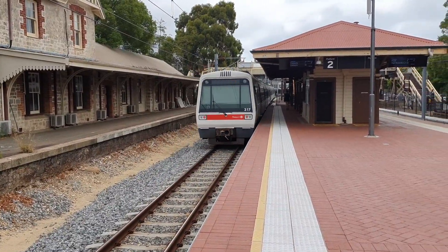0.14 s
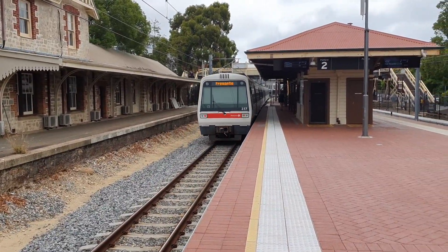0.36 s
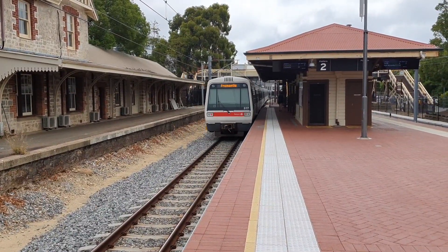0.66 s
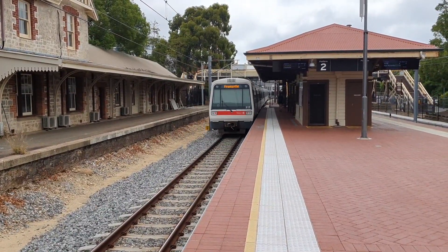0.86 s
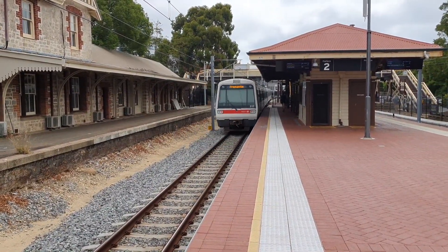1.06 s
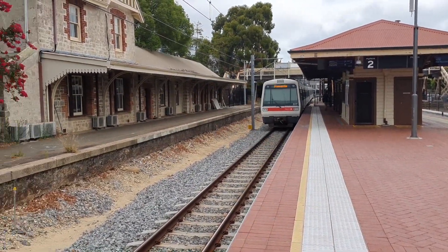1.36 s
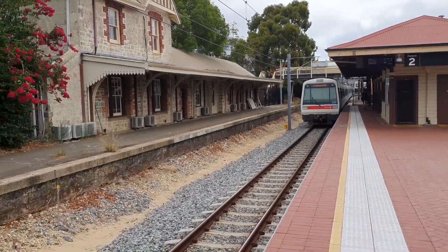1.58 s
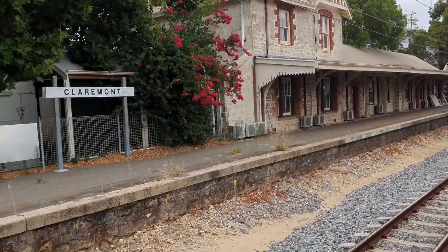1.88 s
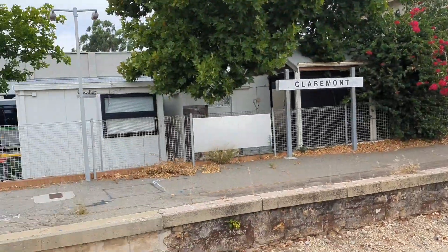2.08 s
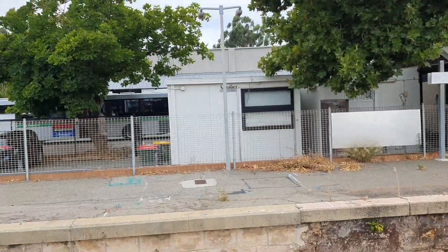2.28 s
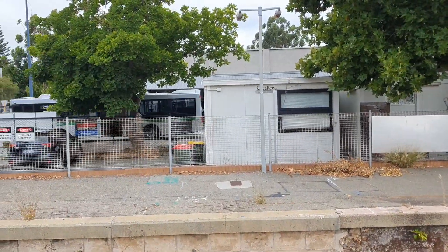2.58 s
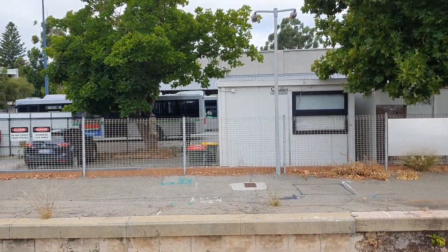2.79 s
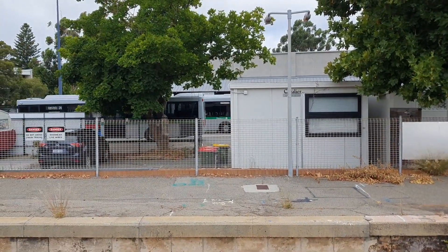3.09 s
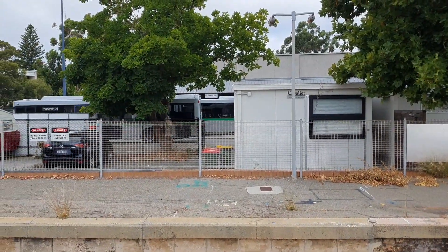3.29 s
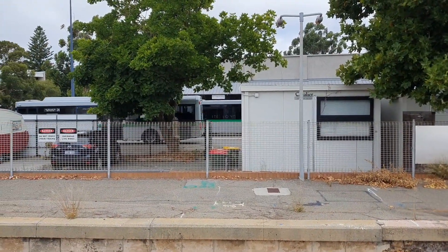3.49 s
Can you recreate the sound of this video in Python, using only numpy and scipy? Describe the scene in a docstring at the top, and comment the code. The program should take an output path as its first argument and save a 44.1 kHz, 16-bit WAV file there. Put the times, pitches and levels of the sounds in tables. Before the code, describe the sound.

Throbbing gear whine of a departing electric train, with low rolling noise and metallic knocks, fades at an open station platform as the handheld phone turns; a bus yard's low drone and light rattles take over.

```python
"""A gear whine climbs and throbs as an electric train pulls away, with wheel knocks, rolling noise and hums.
The phone then turns towards a bus yard, whose drone and rattle take over; birds chirp now and then, and
small ticks come from the hand on the phone. Whine, low tones and chirps are sines, knocks are decaying
sines, and rolling noise, yard, hums, rings and rattles are filtered noise. Sound from one direction
reaches the two ports (left and right microphone openings) at slightly different times."""
import sys
import numpy as np
from scipy import signal
from scipy.fft import rfft, irfft, next_fast_len
from scipy.io import wavfile
from scipy.ndimage import uniform_filter1d, map_coordinates

SR = 44100
rng = np.random.default_rng(int(sys.argv[2]) if len(sys.argv) > 2 else 0)


def persist_wave(psi):
    """Save psi, clipped to +-1, as 16-bit WAV."""
    counts = np.round(np.clip(psi, -1, 1) * 32767).astype(np.int16)
    wavfile.write(sys.argv[1], SR, np.atleast_2d(counts).T)


N = 160965
T = np.arange(N) / SR  # time in seconds
F = np.arange(N // 2 + 1) * SR / N + 1e-3  # frequency in Hz, kept above zero for the logarithms
LONG = next_fast_len(N)  # noises are made a little longer, for speed, and cut
F_LONG = np.arange(LONG // 2 + 1) * SR / LONG + 1e-3


def undb(db):
    """Turn dB into a gain."""
    return 10 ** (np.asarray(db) / 20)


def curve(rows):
    """Read a two-column table along time, with straight lines between rows."""
    return np.interp(T, *np.array(rows).T)


def by_hz(rows, hz):
    """Read a table along log frequency, so equal musical steps count equally."""
    pitch, value = np.array(rows).T
    return np.interp(np.log(hz), np.log(pitch), value)


def walk(rate):
    """Random levels, `rate` new ones per second, joined by slopes; spread near 1."""
    hold = int(SR / rate)
    steps = np.repeat(rng.standard_normal(N // hold + 1), hold)
    return 1.19 * uniform_filter1d(steps, hold)[:N]


def tone(hz, waver_hz):
    """A sine of random phase whose pitch wavers; summing its pitch over time gives its phase."""
    turns = np.cumsum(hz + waver_hz * walk(15)) / SR
    return np.sin(2 * np.pi * (rng.uniform() + turns))


def white():
    """Spectra of three unrelated white noises."""
    return rfft(rng.standard_normal((3, LONG)))


def ring(hz, width_hz):
    """Three unrelated noises narrowed to one resonance, rms 1."""
    resonance = 1 / (1 + (2 * (F_LONG - hz) / width_hz) ** 2)
    x = irfft(white() * resonance, LONG)[:, :N]
    return x / x.std()


def decay(t0, t60, rise):
    """An envelope that rises at t0 and dies away by 60 dB in t60 seconds."""
    since = np.clip(T - t0, 0, None)
    return (1 - np.exp(-since / rise)) * np.exp(-np.log(1000) * since / t60)


TURN_S, TURN_LEN_S = 1.911, 0.26


def turn():
    """Where the phone points: 0 facing the train, 1 facing the yard, with a smooth swing between."""
    return .5 + .5 * np.tanh(2 * (T - TURN_S) / TURN_LEN_S)


# Pitch of the gear mesh as the train gathers speed. Each row: time in seconds, pitch in Hz.
MESH_PITCH = [(0, 273.8), (.14, 279.3), (.31, 287.5), (.45, 282.2), (.6, 284), (.87, 289), (1.1, 292.9),
              (1.3, 296.8), (1.49, 300.6), (1.68, 307), (1.85, 304), (2.1, 305.6), (2.4, 307.8),
              (2.75, 313.3), (3.1, 319.4), (3.4, 322.1), (3.55, 333), (3.65, 331)]
# Throbbing level of the whine, both bogies together. Each row: time in seconds, rms level in dB.
WHINE_LEVEL = [(0.0, -16), (0.02, -51), (0.06, -28.5), (0.09, -30), (0.14, -25.5), (0.2, -40),
               (0.22, -30.5), (0.32, -23.5), (0.37, -45), (0.45, -30), (0.47, -34), (0.5, -27.5),
               (0.6, -20.5), (0.69, -38.5), (0.87, -16.5), (0.92, -30.5), (0.95, -28.5), (0.98, -34),
               (1.05, -26), (1.08, -18), (1.2, -21), (1.23, -29.5), (1.28, -33), (1.31, -18.5), (1.34, -34),
               (1.43, -24), (1.45, -29.5), (1.49, -15.5), (1.54, -29), (1.57, -23.5), (1.62, -30),
               (1.66, -17.5), (1.69, -19), (1.73, -29.5), (1.77, -23.5), (1.8, -43), (1.84, -24.5),
               (1.89, -23), (1.92, -32.5), (2.02, -28), (2.08, -28), (2.11, -28), (2.15, -21.5),
               (2.18, -29), (2.23, -22.5), (2.27, -28), (2.39, -21), (2.43, -28), (2.46, -21), (2.59, -30),
               (2.62, -25), (2.65, -32.5), (2.71, -26), (2.78, -29.5), (2.82, -42), (2.87, -26),
               (2.98, -36), (3.04, -29), (3.13, -26), (3.2, -29.5), (3.27, -28), (3.37, -32.5),
               (3.45, -40.5), (3.5, -36), (3.57, -31.5), (3.62, -54), (3.65, -29)]
# Second bogie (wheel frame). Each row: time in seconds, level against the first bogie in dB.
SECOND_BOGIE_LEVEL = [(0, -17), (1.1, -14.5), (1.7, -11), (2.1, -13), (2.6, -2), (2.9, -7), (3.3, -18),
                      (3.65, -4)]
BOGIE_SHARP_HZ, WHINE_WAVER_HZ = 11, 1.12


def whine():
    """The meshing gear teeth of two bogies sing as two sines, the second one a little sharper."""
    hz = curve(MESH_PITCH)
    second = undb(curve(SECOND_BOGIE_LEVEL))
    both = tone(hz, WHINE_WAVER_HZ) + second * tone(hz + BOGIE_SHARP_HZ, WHINE_WAVER_HZ)
    both = both * np.sqrt(2 / (1 + second ** 2))  # the pair keeps rms 1
    return both * undb(curve(WHINE_LEVEL))


# Low tones that come and go. Each row: time in seconds, then rms level in dB of the tone near 146 Hz,
# of the tone near 100 Hz, and of the tone under the whine.
LOW_TONE_LEVELS = [(0, -40, -28, -45), (.3, -35.5, -41.5, -51), (.62, -39.5, -43, -47),
                   (.75, -46, -48.5, -33), (1.0, -56, -42, -36), (1.35, -52, -45, -39),
                   (1.5, -54, -35.5, -34), (1.65, -47, -50, -38), (1.85, -52, -47, -49),
                   (2.0, -52, -29, -47), (2.15, -44, -40, -52), (2.3, -52, -30.5, -52),
                   (2.4, -44, -38.5, -52), (2.55, -49, -36, -55), (2.7, -50, -30.5, -52),
                   (2.85, -54, -44, -43), (3.65, -52, -43, -59)]
LOW_TONE_HZ, MAINS_TONE_HZ, TONE_WAVER_HZ = 146.2, 98.6, 1.96
UNDER_MESH_SHARE = 0.93  # pitch of the third tone as a share of the smoothed mesh pitch


def tones():
    """Motor and transformer tones below the whine are plain sines; one climbs with the gear mesh."""
    times, *levels = np.array(LOW_TONE_LEVELS).T
    under_mesh = UNDER_MESH_SHARE * uniform_filter1d(curve(MESH_PITCH), SR // 2)
    x = 0
    for hz, db in zip((LOW_TONE_HZ, MAINS_TONE_HZ, under_mesh), levels):
        gain = undb(np.interp(T, times, db))
        x = x + np.sqrt(2) * gain * tone(hz, TONE_WAVER_HZ)  # root 2 brings a sine to rms 1
    return x


# Wheel knocks. Each row: start in seconds, strength in dB.
KNOCK_TIMES = [(0.168, -25), (0.236, -22.5), (0.516, -21), (0.793, -24), (1.07, -25.5), (2.897, -23),
               (3.17, -40)]
# What each knock rings in the wheel. Each row: pitch in Hz, level against the knock's strength in dB,
# time to die away by 60 dB in seconds.
WHEEL_MODES = [(410, -9, 0.3), (461.5, -1.5, 0.45), (487, -3.5, 0.39), (501.3, -3.5, 0.49),
               (548, -13, 0.32), (605, -7.5, 0.33), (871, -8, 0.18)]
KNOCK_WAVER_HZ, KNOCK_RISE_S = 3.98, 0.0064


def knocks():
    """Each knock sets off the wheel's own pitches, each dying away at its own speed."""
    x = 0
    for hz, mode_db, t60 in WHEEL_MODES:
        envelope = sum(undb(db) * decay(t0, t60, KNOCK_RISE_S) for t0, db in KNOCK_TIMES)
        x = x + undb(mode_db) * tone(hz, KNOCK_WAVER_HZ) * envelope
    return x


# Rough rings of the running gear. Each row: time in seconds, then rms level in dB of the ring near 2 kHz,
# near 3.5 kHz and near 4.4 kHz.
RING_LEVELS = [(0.0, -40, -54, -62), (0.06, -52, -60, -60), (0.12, -60, -51, -62), (0.2, -49, -53, -57),
               (0.29, -40.5, -55, -61), (0.42, -63, -60, -76), (0.55, -53, -60, -60), (.8, -49, -57, -64),
               (1.0, -58.5, -57.5, -63), (1.37, -59, -61, -68), (1.85, -52, -61, -61),
               (1.97, -50, -54, -68), (2.14, -52, -57, -74), (2.22, -56, -59, -73), (2.33, -47.5, -61, -76),
               (2.4, -55, -64, -68), (2.45, -40, -64, -61), (2.53, -53.5, -61, -67), (2.9, -52, -68, -71),
               (3.16, -51, -66, -60), (3.4, -58, -58, -60), (3.65, -50, -62, -64)]
RING_HZ = 2045, 3510, 4410
RING_WIDTH_HZ, RING_FAR_WIDTH_HZ = (55, 130, 220), (70, 400, 450)  # near train, far train
RING_FLICKER_DB, RING_FLICKER_PER_S, RING_BLUR_S = 1.5, 30, 1.6


def gear_rings():
    """Noise in three resonances, which blur into wider ones as the train leaves."""
    times, *levels = np.array(RING_LEVELS).T
    far = np.clip(T / RING_BLUR_S, 0, 1) ** 2
    x = 0
    for hz, width_hz, far_hz, db in zip(RING_HZ, RING_WIDTH_HZ, RING_FAR_WIDTH_HZ, levels):
        blurred = np.sqrt(1 - far) * ring(hz, width_hz) + np.sqrt(far) * ring(hz, far_hz)
        flicker = RING_FLICKER_DB * walk(RING_FLICKER_PER_S)
        x = x + blurred * undb(np.interp(T, times, db) + flicker)
    return x


FLICKER_DB, FLICKER_PER_S, SWELL_DB, SWELL_PER_S = .6, 12, .4, 7
TREBLE_FLICKER_DB, TREBLE_FLICKER_PER_S = 1.1, 28


def bed(spectrum, db):
    """Coloured noise in overlapping bands half an octave apart that swell together and flicker alone."""
    spec = white() * undb(by_hz(spectrum, F_LONG))
    spec = spec / irfft(spec, LONG).std()
    swell = SWELL_DB * walk(SWELL_PER_S)
    out = 0
    for k in np.arange(20):
        distance = np.clip(2 * np.log2(F_LONG / 25) - k, -1, 1)  # half octaves from the band's centre
        band = np.cos(np.pi / 2 * distance) ** 2
        flicker = FLICKER_DB * walk(FLICKER_PER_S)
        treble = TREBLE_FLICKER_DB * (k > 12) * walk(TREBLE_FLICKER_PER_S)
        out = out + irfft(spec * band, LONG)[:, :N] * undb(swell + flicker + treble)
    return out * undb(db)


# Colour of the rolling noise facing the train. Each row: pitch in Hz, relative level per Hz in dB.
ROLL_COLOUR = [(16, -32.5), (28, -6.5), (76, -2.5), (130, -11.5), (188, -15.5), (240, -9), (320, -8),
               (363, -17), (449, -9.5), (540, -17), (600, -15.5), (1020, -23.5), (1260, -25), (1360, -30.5),
               (2020, -28), (2710, -35.5), (3010, -40.5), (4020, -45.5), (6500, -49), (9000, -56.5),
               (13900, -60.5), (15600, -76)]
ROLL_DB, FADE_DB_PER_S = -25, -1


def rolling():
    """Wheels rolling on rails make a wide noise that fades as the train leaves and as the phone turns."""
    return np.sqrt(1 - turn()) * undb(FADE_DB_PER_S * T) * bed(ROLL_COLOUR, ROLL_DB)


# Colour of the yard's drone. Each row: pitch in Hz, relative level per Hz in dB.
YARD_COLOUR = [(16, -36), (28, -10.5), (76, 1), (102, -6), (144, -15), (244, -11.5), (320, -9),
               (373, -13.5), (426, -6), (540, -12.5), (616, -14.5), (941, -16), (1050, -24.5), (1190, -20),
               (1470, -30), (2080, -27.5), (2600, -34), (3170, -39), (6000, -47), (8890, -53), (13200, -54),
               (14000, -59.5), (15600, -81)]
YARD_DB = -28


def yard():
    """The bus yard's drone is a wide noise that comes in with the turn."""
    return np.sqrt(turn()) * bed(YARD_COLOUR, YARD_DB)


# Hums and ringing of train and yard. Each row: pitch in Hz, width in Hz, starting level in dB while facing
# the train, level in dB facing the yard; fade, flicker and the rumble's own level act on top of these.
HUM_BANDS = [(53.7, 9.2, -39, -31.5), (97.7, 10.3, -39.5, -36), (422.3, 11.5, -51.5, -39),
             (504, 3.8, -45, -48), (615, 25, -75, -42), (2133, 60, -71, -59), (2210, 60, -73, -57),
             (2340, 99, -65, -56), (2510, 150, -65, -60), (2700, 170, -55.5, -65.5),
             (10150, 1700, -62.5, -68.5)]
HUM_FADE_DB_PER_S, HUM_FLICKER_DB = -1, 1.2
# above this pitch the yard's rattling bands surge together and flutter alone
FLUTTER_ABOVE_HZ, FLUTTER_DB, FLUTTER_PER_S, SURGE_DB, SURGE_PER_S = 2000, 3, 45, 1.5, 9


def hums():
    """Narrow noises hum and ring; their levels glide from train to yard with the turn."""
    yard_share = turn()
    surge = SURGE_DB * walk(SURGE_PER_S)
    x = 0
    for hz, width_hz, train_db, yard_db in HUM_BANDS:
        db = (train_db + HUM_FADE_DB_PER_S * T) * (1 - yard_share) + yard_db * yard_share
        flutter = surge + FLUTTER_DB * walk(FLUTTER_PER_S)
        db = db + (hz > FLUTTER_ABOVE_HZ) * yard_share * flutter
        x = x + ring(hz, width_hz) * undb(db + HUM_FLICKER_DB * walk(8))
    return x


# Boost or cut of the upper rumble around 800 Hz. Each row: time in seconds, change in dB.
MIDDLE_CHANGE = [(0, 0.5), (.7, 0), (1.5, -1), (2.05, -3), (2.6, 0), (3.08, -2), (3.17, 8), (3.28, -3),
                 (3.65, 0.5)]
MIDDLE_HZ, MIDDLE_OCTAVES = 805, 0.43


def shape_middle(x):
    """A smooth band around 800 Hz is made louder or softer along time."""
    bell = np.exp(-(np.log2(F / MIDDLE_HZ) / MIDDLE_OCTAVES) ** 2)
    middle = irfft(rfft(x) * bell, N)
    return x + middle * (undb(curve(MIDDLE_CHANGE)) - 1)


# Level of the low rumble. Each row: time in seconds, level in dB.
RUMBLE_LEVEL = [(0.0, -52), (0.02, -27.5), (0.16, -37), (0.2, -27.5), (0.58, -32.5), (0.61, -30),
                (0.68, -28), (0.83, -30), (0.88, -40), (0.91, -30.5), (1.26, -30.5), (1.43, -37),
                (1.49, -27), (1.67, -34.5), (1.72, -29.5), (1.85, -36), (1.92, -26.5), (2.21, -30.5),
                (3.11, -33.5), (3.14, -53.5), (3.17, -30), (3.27, -36), (3.31, -25), (3.36, -50),
                (3.4, -29), (3.65, -32.5)]
RUMBLE_TOP_HZ = 123
RUMBLE_EVEN, RUMBLE_EVEN_S = 0.26, 0.064  # how far swings are evened out (0-1), and over what time


def shape_rumble(x):
    """The lowest part of the noise has its own swings partly evened out, then follows the level table."""
    low = irfft(rfft(x) / (1 + (F / RUMBLE_TOP_HZ) ** 8), N)
    power = uniform_filter1d(low ** 2, int(RUMBLE_EVEN_S * SR)) + 1e-9
    even = low / power ** (RUMBLE_EVEN / 2)
    return x - low + even / even.std() * undb(curve(RUMBLE_LEVEL))


def noise():
    """All the steady noises together, with middle and rumble shaped."""
    return shape_rumble(shape_middle(rolling() + yard() + hums() + gear_rings()))


# Rattles in the yard. Each row: start in seconds, level in dB.
RATTLE_TIMES = [(2.191, -36.5), (2.447, -38), (2.53, -49), (2.595, -42), (2.674, -42), (2.7192, -45),
                (2.82, -49), (2.855, -36), (2.8724, -41), (2.96, -42), (3.0819, -42), (3.1047, -38),
                (3.14, -45), (3.345, -46), (3.45, -40), (3.611, -50)]
RATTLE_HZ, RATTLE_WIDTH_HZ, RATTLE_T60_S = 2120, 600, 0.096


def rattles():
    """Each rattle is a short burst of noise in one wide resonance."""
    envelope = sum(undb(db) * decay(t0, RATTLE_T60_S, 0.001) for t0, db in RATTLE_TIMES)
    return ring(RATTLE_HZ, RATTLE_WIDTH_HZ)[0] * envelope


# Bird chirps. Each row: start in seconds, length in seconds, first pitch in Hz, last pitch in Hz,
# peak level in dB.
BIRD_CHIRPS = [(.255, .03, 3400, 3170, -51), (.29, .026, 3480, 3190, -46), (1.915, .11, 2950, 2720, -53)]


def chirps():
    """Each chirp is a sine that slides down in pitch while its level rises and falls."""
    x = 0
    for t0, length, from_hz, to_hz, db in BIRD_CHIRPS:
        part = np.clip((T - t0) / length, 0, 1)
        x = x + undb(db) * np.sin(np.pi * part) * tone(from_hz + (to_hz - from_hz) * part, 0)
    return x


# Ticks of the hand. Each row: start in seconds, level in dB, pitch in Hz, left over right in dB.
HAND_TICKS = [(.579, -39, 4500, 0), (.674, -43, 10500, 6), (.72, -41, 5050, 0), (1.435, -48, 9500, 4),
              (.93, -46, 4300, 0), (1.46, -44, 4300, 3), (1.51, -46, 8500, 4), (1.89, -47, 6000, 3),
              (1.905, -47, 10500, 4)]
TICK_T60_S, TICK_RISE_S = .008, .0004
CRACK_DB, CRACK_T60_S = -4, .008  # level against the tick's level


def ticks():
    """Short bright ticks close to the ports: a ringing sine and a thin crack of noise."""
    crack = undb(CRACK_DB) * rng.standard_normal(N)
    x = 0
    for t0, db, hz, pan_db in HAND_TICKS:
        ringing = decay(t0, TICK_T60_S, TICK_RISE_S) * np.sin(2 * np.pi * hz * (T - t0))
        burst = ringing + crack * decay(t0, CRACK_T60_S, TICK_RISE_S)
        left_right = np.array([[pan_db], [-pan_db]]) / 2
        x = x + undb(db + left_right) * burst
    return x


# How much of the noise comes from one direction. Each row: pitch in Hz, share of the power (0-1).
DIRECT_SHARE = [(30, 0.88), (60, 0.99), (300, 0.99), (700, 0.67), (1200, 0.65), (2000, 0.26), (3500, 0.24),
                (8000, 0.13)]


def spread(trio):
    """Of three noises one becomes direct sound, the other two the sound from all around at each port."""
    share = np.clip(by_hz(DIRECT_SHARE, F), 0, 1)
    spec = rfft(trio)
    return irfft(spec[0] * np.sqrt(share), N), irfft(spec[1:] * np.sqrt(1 - share), N)


LAG_BEFORE_S, LAG_AFTER_S = -0.00026, .0004  # left port behind right; below zero the left is ahead
EDGE_S = .003


def scene():
    """Direct sound reaches one port first; the lag swings over as the phone turns."""
    direct, around = spread(noise())
    direct = direct + whine() + tones() + knocks() + rattles() + chirps()
    half_lag = (LAG_BEFORE_S + (LAG_AFTER_S - LAG_BEFORE_S) * turn()) * SR / 2  # in samples
    ports = [map_coordinates(direct, [np.arange(N) - side * half_lag], mode="mirror") for side in (1, -1)]
    edge = np.clip(np.minimum(T, T[::-1]) / EDGE_S, 0, 1) ** 2  # short fades at both ends
    return (np.array(ports) + around + ticks()) * edge


# How the phone narrows the sound. Each row: pitch in Hz, gain of the left-right difference in dB.
SIDE_GAIN = [(60, -1.5), (150, -1.5), (300, -7.5), (600, -4.5), (1000, -7.5), (1500, 0)]
TREBLE_LEFT_DB = 2.5  # left over right, at its most near 8.5 kHz
LOW_CUT_HZ, TOP_HZ = 42.5, 15600


def record(dry):
    """The phone narrows and rolls off the bass, makes the left port brighter and cuts the top."""
    f = np.arange(N + 1) * SR / (2 * N) + 1e-3
    mirrored = np.concatenate([dry, dry[:, ::-1]], axis=1)  # no jump where the transform wraps round
    left, right = rfft(mirrored)
    mid = (left + right) / 2
    side = (left - right) / 2 * undb(by_hz(SIDE_GAIN, f))
    tilt = TREBLE_LEFT_DB / 2 * np.exp(-(np.log2(f / 8500) / 0.48) ** 2)
    low_cut = 1 / np.sqrt(1 + (LOW_CUT_HZ / f) ** 4)
    x = irfft(np.array([mid + side, mid - side]) * undb(np.array([tilt, -tilt])) * low_cut)
    top_cut = signal.ellip(8, .2, 70, TOP_HZ, fs=SR, output="sos")
    return signal.sosfilt(top_cut, x[:, :N])


dry = scene()
out = record(dry)
persist_wave(out)
```